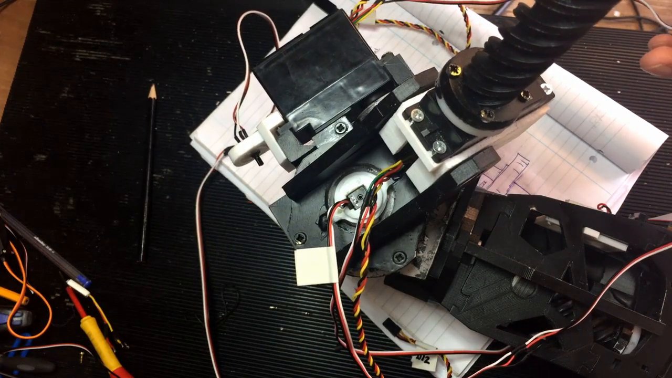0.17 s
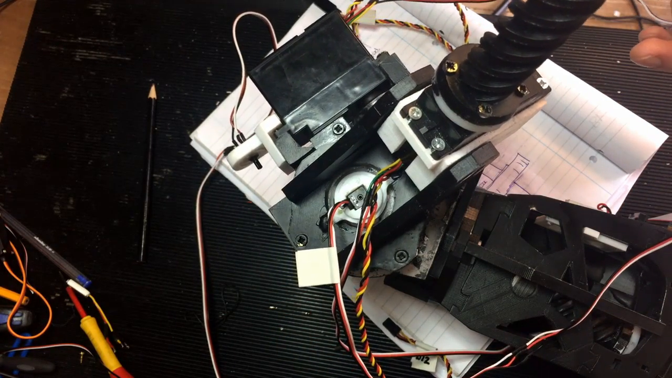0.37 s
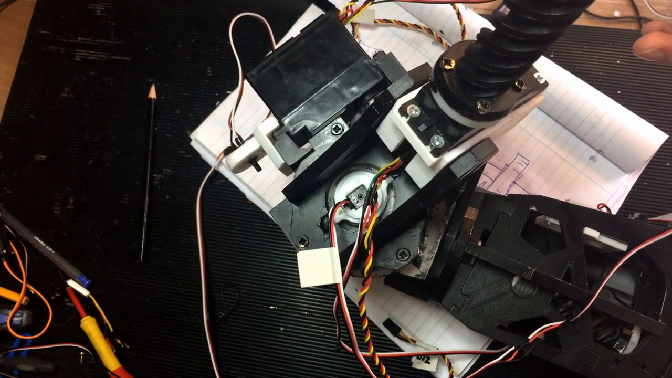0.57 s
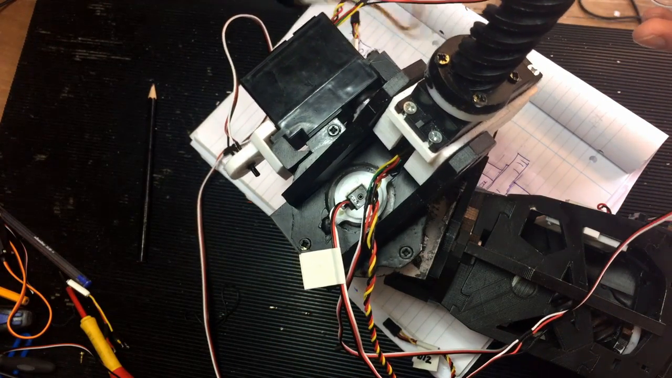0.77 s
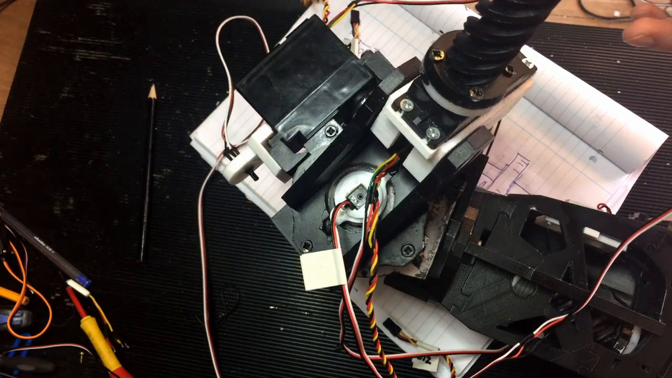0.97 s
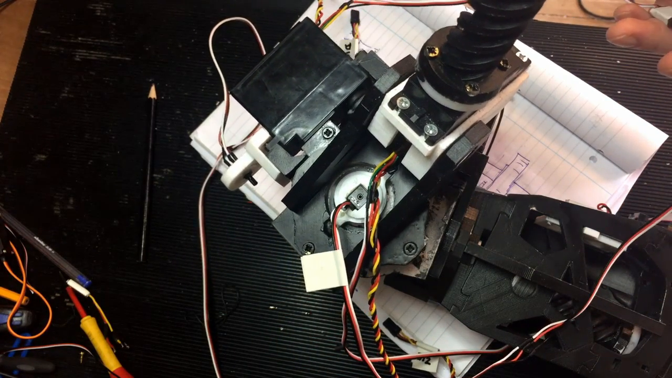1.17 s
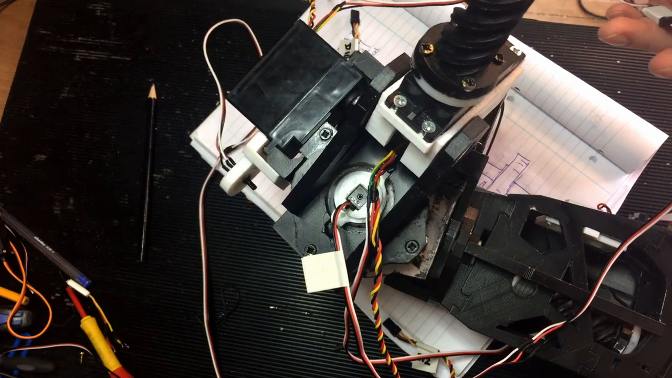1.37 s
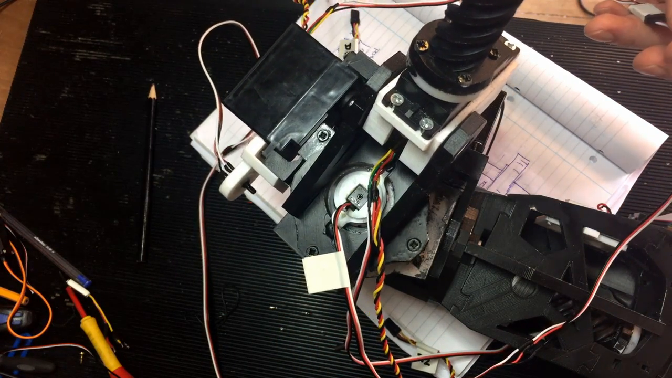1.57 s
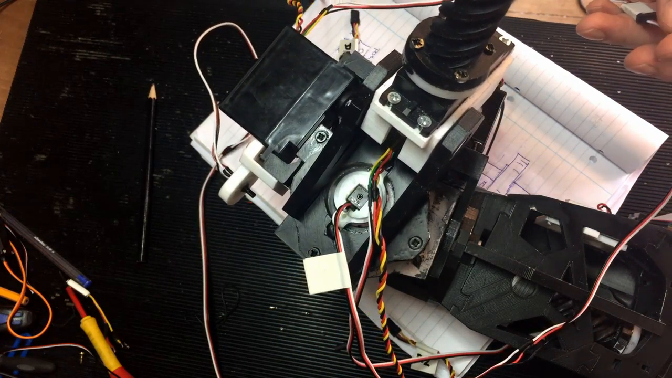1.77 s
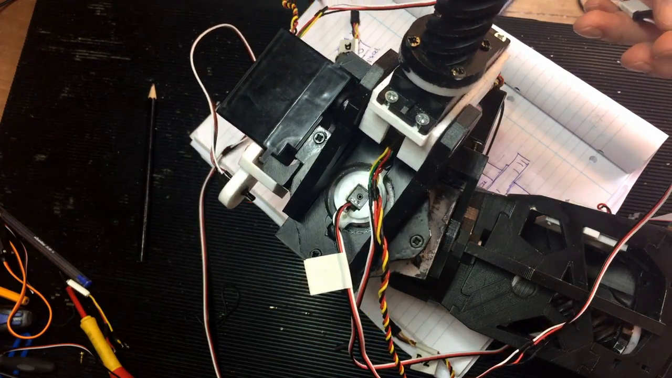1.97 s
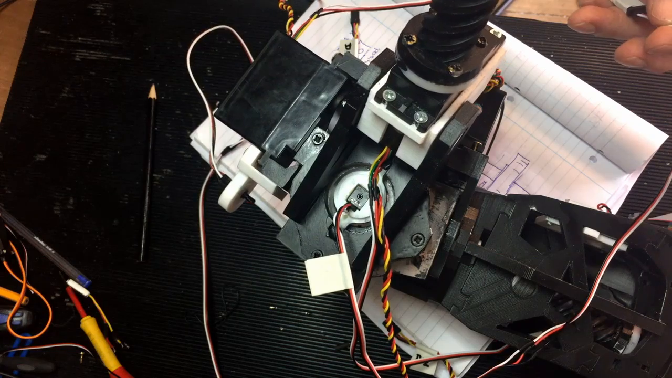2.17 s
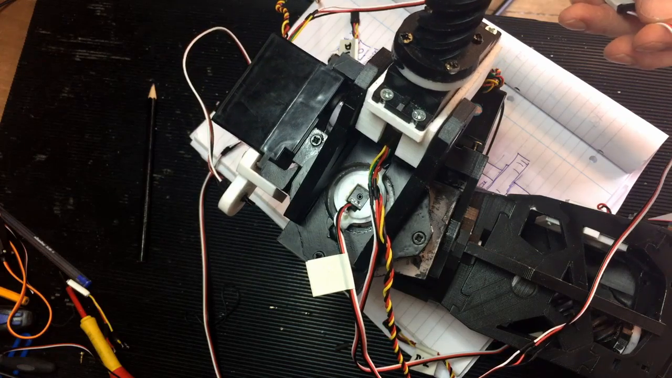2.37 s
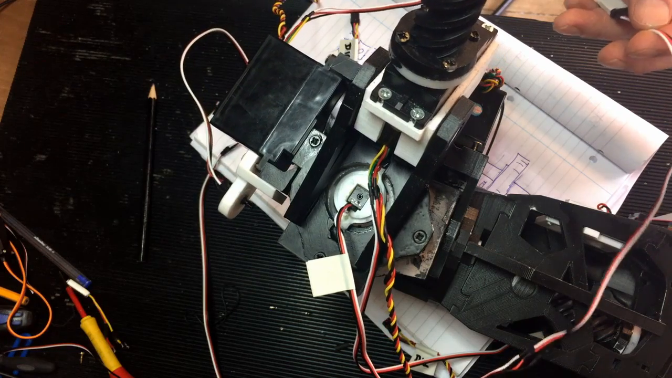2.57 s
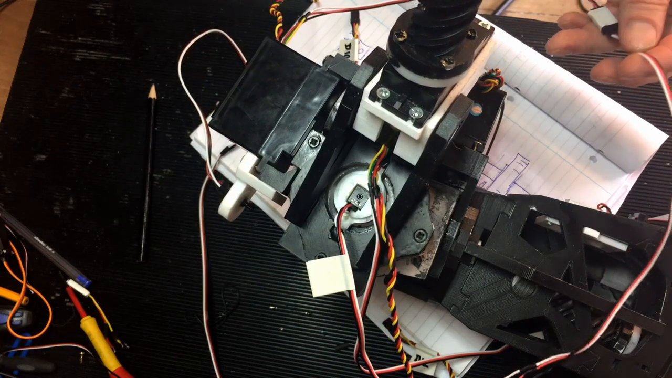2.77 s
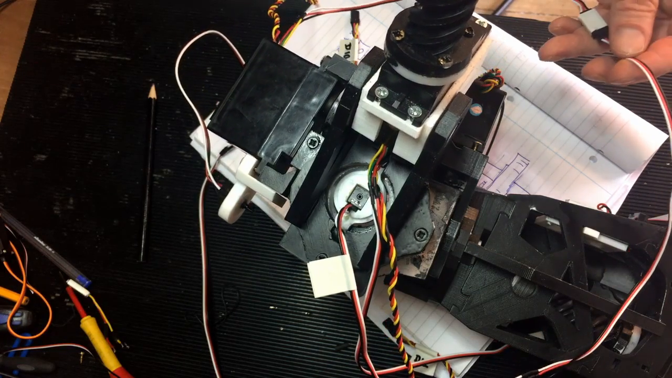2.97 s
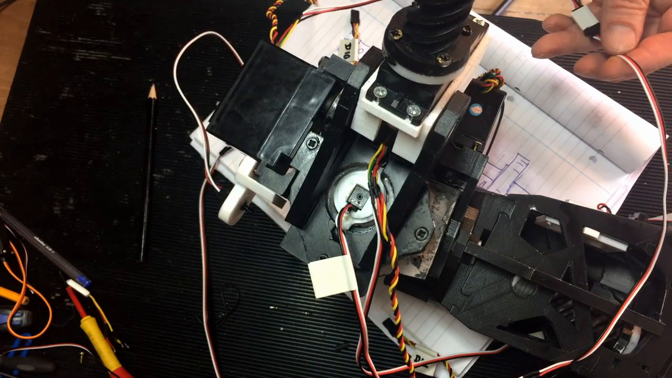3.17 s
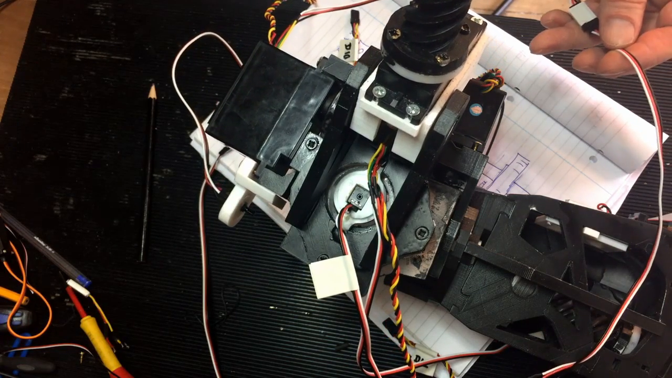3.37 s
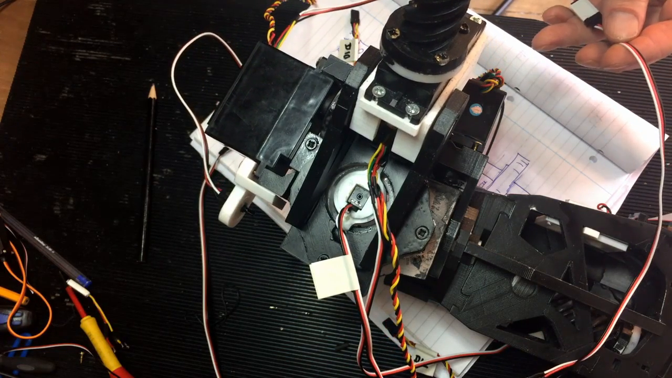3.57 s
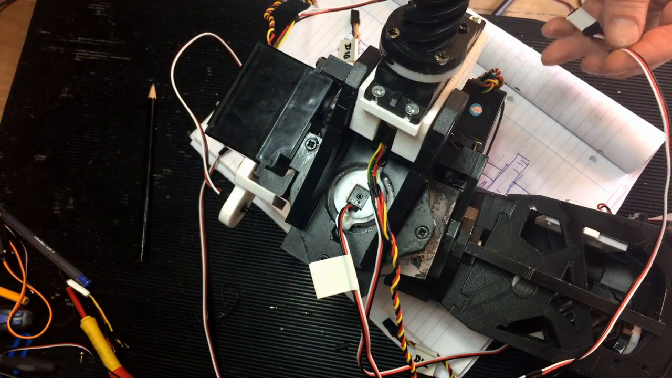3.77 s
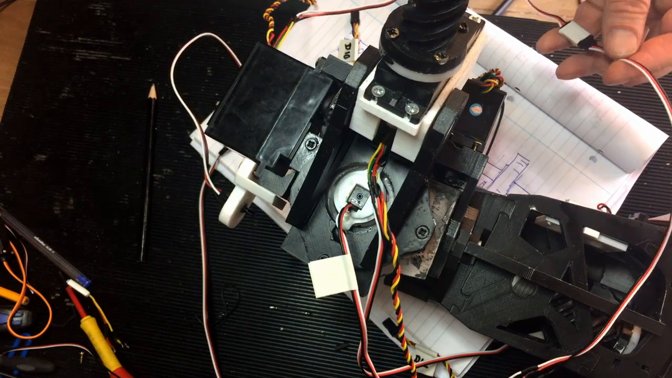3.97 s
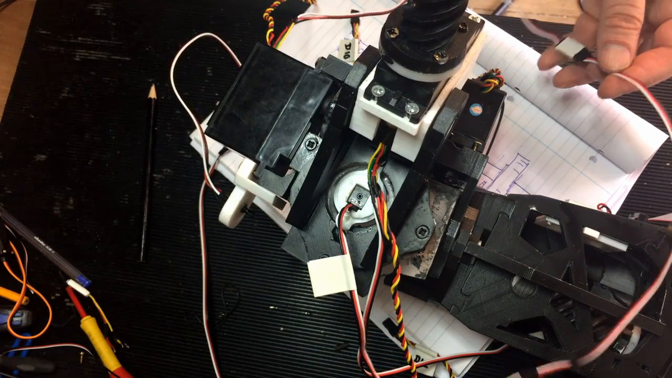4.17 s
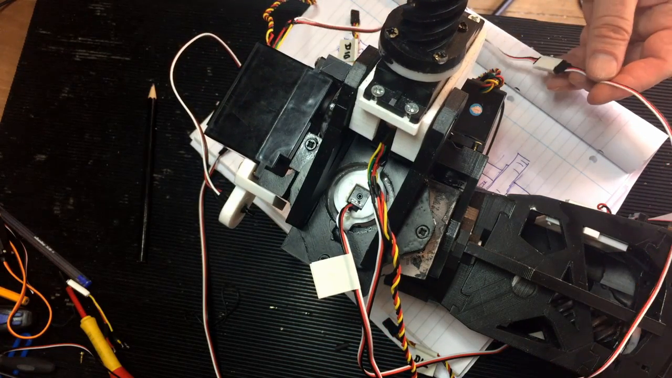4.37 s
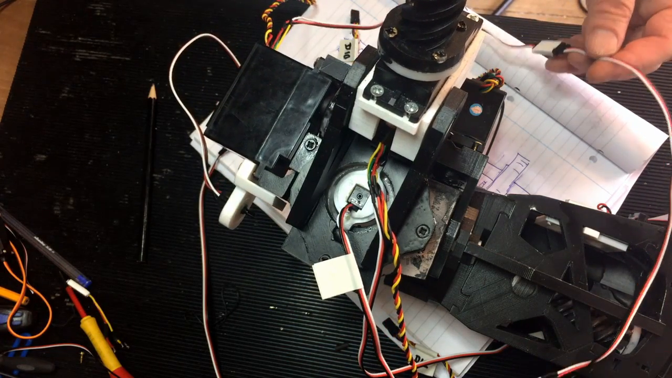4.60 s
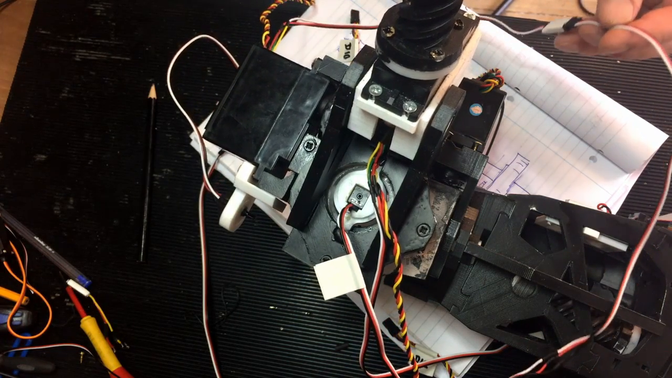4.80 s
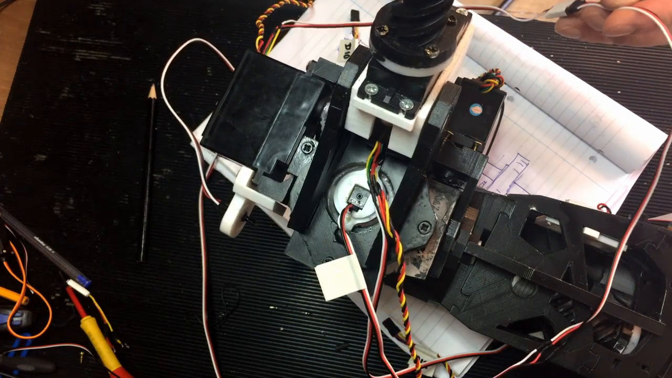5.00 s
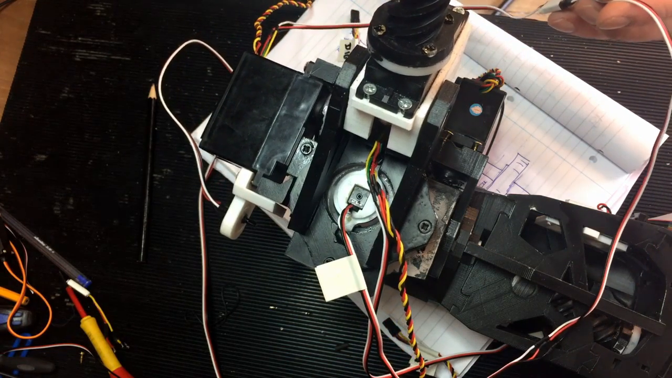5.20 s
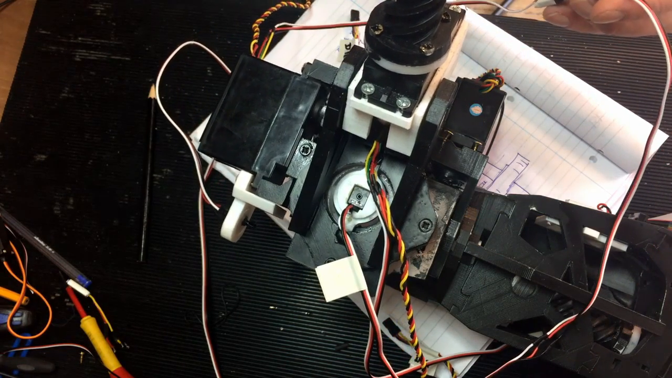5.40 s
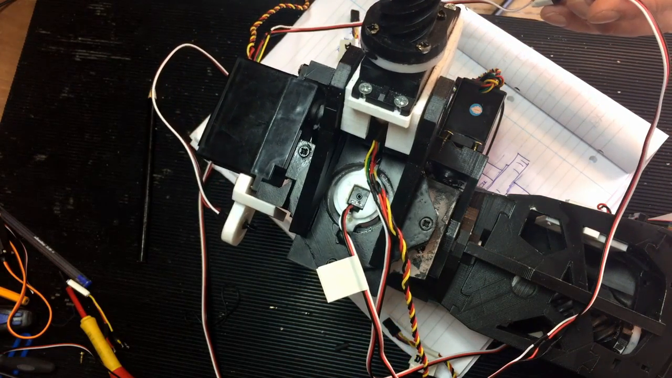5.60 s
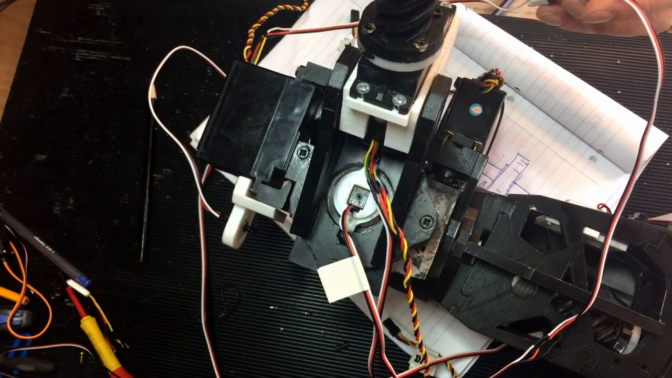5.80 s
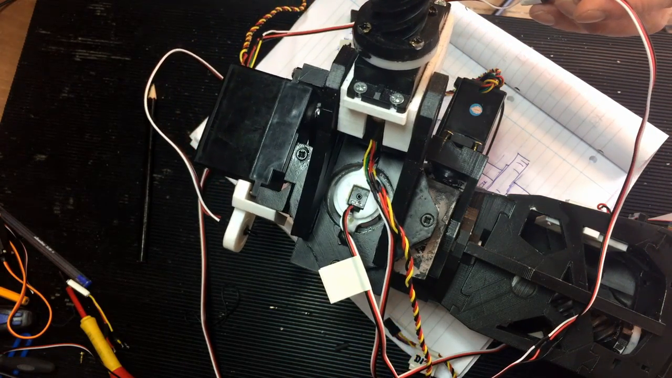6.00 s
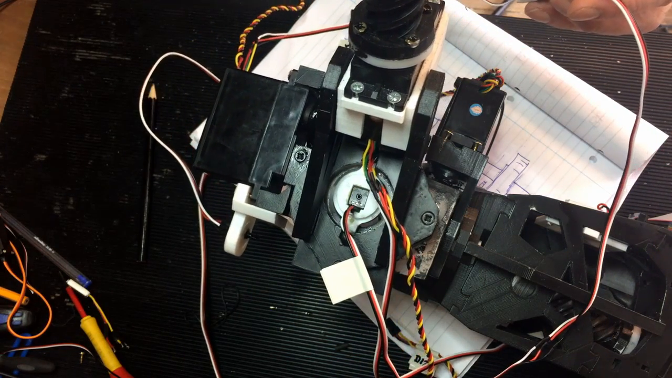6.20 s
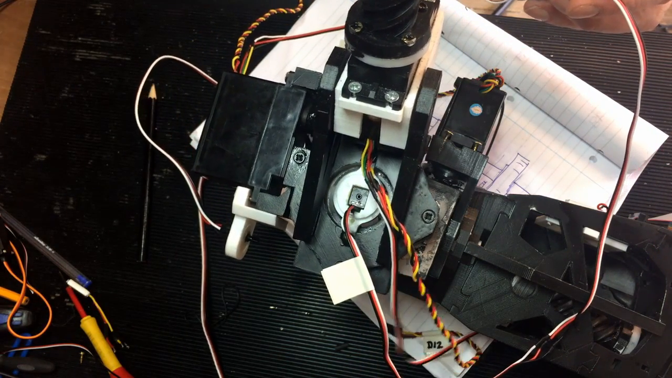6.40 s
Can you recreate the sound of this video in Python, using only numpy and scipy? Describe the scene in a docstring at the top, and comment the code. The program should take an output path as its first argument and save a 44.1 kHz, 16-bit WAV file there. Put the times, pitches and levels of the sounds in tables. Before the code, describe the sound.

A small geared servo whines and rasps with rapid ticking, slows and sinks almost away, clicks lightly, then whines thinly and fuller again.

```python
"""A small geared servo swings a robot arm on a workbench; its pinion whines and rasps through the housing,
while a holding servo ticks at every control pulse and the joints judder. The gears slow and sink almost away, a
hand-held lead clicks on the parts, and the whine picks up again, thin at first and then fuller. Throughout, two
frame modes drone and swell over a faint steady hum, room air and a thin servo hiss. Tones are drifting sines;
rasp, air and hiss are filtered noise; ticks are impulses ringing decaying modes."""
import sys
import numpy as np
from scipy import signal
from scipy.fft import rfft, irfft
from scipy.io import wavfile
from scipy.ndimage import uniform_filter1d

SR = 44100
rng = np.random.default_rng(int(sys.argv[2]) if len(sys.argv) > 2 else 0)


def store_pcm(level_fs):
    """Save levels as 16-bit WAV."""
    pcm = np.round(np.clip(level_fs, -1, 1) * 32767).astype(np.int16)
    wavfile.write(sys.argv[1], SR, np.atleast_2d(pcm).T)


N = 284356
TIME = np.arange(N) / SR   # s
BINS = np.maximum(np.arange(N // 2 + 1) * SR / N, 1)   # Hz

# motor speed through the two moves: (time [s], speed [turns/s])
MOTOR_SPEED = [(0, 535), (.2, 526), (.33, 487), (.6, 556), (.8, 655), (.96, 757), (1.1, 712), (1.2, 650),
               (1.48, 533), (1.73, 540), (1.88, 487), (2.33, 425), (2.7, 315), (3.4, 225), (4.4, 220),
               (4.65, 330), (5.2, 362), (5.5, 453), (5.78, 378), (6.14, 457), (6.45, 408)]
# tone bands of the pinion: (multiple of motor speed [1], first move [dB], second move [dB], smear [Hz])
PINION_ORDERS = [(4, -7, -23, 22), (5, -10.5, -7, 68), (6, -9.5, -2.5, 74), (8, -18, -8.5, 120),
                 (10, -6.5, -4, 110), (14, -20, -20, 910)]
# overall colour of the gearbox: (frequency [Hz], relative density [dB per Hz])
GEARBOX_COLOUR = [(300, -20.5), (600, -29.5), (850, -9.5), (1600, -13.5), (2300, -16), (2650, -7),
                  (3100, -1), (4700, 1.5), (6300, -1.5), (8600, -0.5), (10300, -7), (11500, -10.5),
                  (13500, -15.5), (16000, -20)]
# resonances (+) and dead spots (-) of the housing: (frequency [Hz], width [Hz], gain [dB])
HOUSING_MODES = [(2500, 44, -2.5), (3060, 77, 9.5), (3136, 120, -5), (3320, 61, 8.5), (3460, 62, -2),
                 (3560, 74, 3.5), (3850, 42, 7.5), (4047, 31, 12), (4060, 79, -16), (4176, 50, 9.5),
                 (4445, 68, 7), (4763, 177, -8), (4980, 130, 8.5), (5035, 57, -14.5), (5240, 57, 2),
                 (5540, 290, 7.5), (6120, 58, 2.5), (6200, 183, 7.5), (6440, 120, 10), (6590, 150, -7.5),
                 (7230, 270, -6.5), (7420, 190, 4.5), (7920, 81, 6), (8800, 490, 1), (9470, 150, -9.5),
                 (9900, 200, -0.5), (10390, 470, -9), (11500, 650, 4.5), (13100, 170, 0), (14500, 240, 7)]
# hardest kicks of the holding servo: (time [s], level before KICK_RAISE_DB is added [dB])
HARD_KICKS = [(0.277, -44), (1.627, -48), (1.687, -45.5), (2.109, -43.5), (2.552, -42.5), (2.692, -45),
              (3.177, -45), (3.257, -47.5), (3.438, -49.5), (3.539, -50.5), (3.56, -48.5), (3.6, -54),
              (3.68, -50.5), (3.781, -49), (3.821, -49), (3.841, -48), (3.982, -52), (4.184, -54),
              (4.406, -53), (4.568, -53.5), (5.11, -47), (5.372, -50), (5.976, -38.5)]
# modes that the ticks ring: (frequency [Hz], relative level [dB], t60 [s])
TICK_MODES = [(806, -16, 0.038), (1125, -14.5, 0.063), (1310, -15, 0.033), (1820, -7, 0.011),
              (2260, -15.5, 0.011), (2830, -51, 0.0079), (3277, -14.5, 0.049), (3510, -5, 0.016),
              (4300, -9, 0.0083), (5180, -2, 0.0026), (6300, -19, 0.0032), (8300, -16, 0.0083)]
# the lead and its plug knock on the parts: (time [s], level [dB], centre [Hz], width [octaves], t60 [s])
LEAD_CONTACTS = [(3.26, -43, 8700, 1, 0.017), (3.261, -66, 12200, 0.055, 0.098),
                 (4.025, -33.5, 2160, 0.78, 0.02), (4.0285, -42.5, 1320, 0.61, 0.037),
                 (4.268, -42, 9200, 0.19, 0.012), (4.268, -53, 4950, 2.5, 0.062)]
# the arm judders in its joints: (time [s], length [s], mean frequency [Hz], peak of fundamental [dB])
JOINT_JUDDERS = [(0.839, 0.066, 196, -46), (.925, 0.041, 183, -50.5), (0.965, 0.045, 197.5, -45.5),
                 (1.044, 0.035, 180, -47), (1.257, 0.042, 825, -57), (1.34, 0.053, 567, -56),
                 (2.031, 0.026, 185, -57)]
# low modes of the frame and bench: (mean frequency [Hz], resting level before wavering [dB])
FRAME_MODES = [(49, -74.5), (62, -74.5)]
# the frame sways and one mode swells: (time [s], length [s], mean frequency [Hz], level before wavering [dB])
FRAME_SWAYS = [(.68, 0.15, 49, -59), (.92, 0.19, 62, -56.5), (1.16, .6, 62, -65.5), (3.893, 0.58, 49, -64),
               (5.008, 0.29, 62, -61), (5.497, 1, 62, -56.5), (5.878, 0.83, 49, -62)]
# faint steady hum: (frequency [Hz], level [dB])
STEADY_HUM = [(100, -88.5), (200, -83), (296, -82.5)]
# colour of the workshop's still air: (frequency [Hz], relative density [dB per Hz])
AIR_COLOUR = [(40, -6.5), (70, 4), (180, -4), (330, -8.5), (500, -11.5), (1100, -11.5), (2600, -18.5),
              (5000, -34), (7200, -22), (8800, -22.5), (10500, -28), (12000, -25.5), (15900, -29.5)]

WHEEL_TEETH, PINION_TEETH = 47, 10
CRUISE_SPEED = 500   # turns per s
SECOND_MOVE_S = 4
TONE_DB = -3.5   # tones against the rasp, at cruise
# gear level at cruise, and its rise per doubling of speed
CRUISE_DB, DB_PER_OCTAVE = -43, 9
# between the moves the drive lets go and the gear sound sinks
RELEASE_S, RELEASE_FADE_S = 3.244, 0.23
ENGAGE_S, ENGAGE_FADE_S = 4.588, 0.38
PAUSE_LOSS_DB = 20
# in the second move the lower part of the gear sound builds up last
BUILD_UP_S, BUILD_UP_DB, BUILD_UP_EDGE_HZ = 1.56, 6.5, 2800
PULSE_RATE_HZ, FIRST_PULSE_S = 49.65, .0153
# tick level at cruise, and its rise per doubling of motor speed
TICK_DB, TICK_DB_PER_OCTAVE = -46.5, 7.5
KICK_RAISE_DB = 4
# as the first move dies away the servo hunts and its ticks grow
HUNT_FROM_S, HUNT_TO_S, HUNT_DB = 3.36, 3.9, 3.5
SWAY_FADE_S = .1
ROOM_DB = -66
CUTOFF_HZ = 15900


def gears(tone_rise_db=6, tone_top_hz=7100, runout=0.59, rasp_db=1.85, grain_db=2.5,
          bright_db=9, treble_hz=8400, second_bright_db=2.5):
    """Tooth meshing and sliding friction excite the housing; speed makes the sound purer and brighter."""
    speed, octaves = motor()
    second = TIME > SECOND_MOVE_S   # after the pause the teeth bear on each other differently
    wheel_speed = speed * PINION_TEETH / WHEEL_TEETH
    wheel_turns = np.cumsum(wheel_speed * (1 + .004 * drift(30.8))) / SR
    # an off-centre wheel swings the pitch once a turn, which splits each tone into a cluster
    swing = runout * wheel_speed * np.sin(2 * np.pi * wheel_turns) / PINION_TEETH
    tones = np.zeros(N)
    for multiple, first_db, second_db, smear in PINION_ORDERS:
        order_gain = from_db(np.where(second, second_db, first_db))
        # backlash smears every tone into a narrow band
        tones += order_gain * smeared(multiple * (speed + swing), smear)
    # the plastic teeth soften the highest tones
    tones = low_pass(tones, tone_top_hz) * from_db(TONE_DB + tone_rise_db * octaves)
    sliding = rms_one(rng.standard_normal(N) * from_db(grain_db * drift(700)))
    rasp = rms_one(sliding + worn_wheel(wheel_turns))
    excitation = (rasp + tones) * from_db(rasp_db * drift(62))
    sound = build_up(colour(housing(excitation), GEARBOX_COLOUR))
    # evened out, so that a tone crossing a resonance does not jump in level
    sound = sound / np.sqrt(uniform_filter1d(sound ** 2, size=1500))
    # faster teeth meet harder, which lifts the treble
    body = low_pass(sound, treble_hz)
    treble = (sound - body) * from_db(bright_db * octaves + second_bright_db * second)
    return from_db(gear_level(octaves)) * (body + treble)


def motor():
    """Pitch follows rotation: speed in turns per second, and in octaves relative to cruise."""
    times, speeds = np.transpose(MOTOR_SPEED)
    speed = np.interp(TIME, times, speeds)
    return speed, np.log2(speed / CRUISE_SPEED)


def smeared(hz, width):
    """Two slowly random quadratures blur a moving tone, which comes and goes as the teeth seat and unseat."""
    phase = 2 * np.pi * np.cumsum(hz) / SR
    seating = from_db(2.5 * drift(9) - .7)
    return seating * (drift(width) * np.sin(phase) + drift(width) * np.cos(phase))


def worn_wheel(turns, size=200):
    """Surface flaws recur on every turn: periodicity makes a comb of fine lines that glide with speed."""
    flaws = signal.resample(rng.standard_normal(size), 10 * size)
    return rms_one(np.interp(turns, np.arange(len(flaws)) / len(flaws), flaws, period=1))


def housing(x):
    """Modal response: each resonance lifts its band, each dead spot cuts it."""
    response = 1
    for hz, width, db in HOUSING_MODES:
        detune, gain = 2j * (BINS - hz) / width, from_db(db / 2)
        response = response * (detune + gain) / (detune + 1 / gain)
    return irfft(rfft(x) * response, N)


def build_up(sound):
    """Loading extends the spectrum: the second move starts thin and fills out as the gears take the load."""
    thin = (TIME > SECOND_MOVE_S) * (1 - ramp(ENGAGE_S, BUILD_UP_S) ** 2)
    low_part = low_pass(sound, BUILD_UP_EDGE_HZ)
    return sound + low_part * (from_db(-BUILD_UP_DB * thin) - 1)


def gear_level(octaves, slack_db=3.5, uneven_db=.5):
    """Level in dB follows speed, falls off faster when the teeth run slack, and sinks in the pause."""
    paused = ramp(RELEASE_S, RELEASE_FADE_S) * (1 - ramp(ENGAGE_S, ENGAGE_FADE_S)) ** 2
    slack = np.minimum(octaves, 0) ** 2   # grows below cruise speed
    level = CRUISE_DB + DB_PER_OCTAVE * octaves - slack_db * slack * (1 - paused)
    return level - PAUSE_LOSS_DB * paused + uneven_db * drift(9.2)


def ticks(spread_db=2.5, late_s=.0003, mode_spread_db=3.0, upper_share=0.81, rattle=0.13, rattle_s=0.0018):
    """Impulsive excitation: each control pulse jerks the holding servo's gears across their backlash."""
    pulse_s = np.arange(FIRST_PULSE_S, TIME[-1] - .01, 1 / PULSE_RATE_HZ)
    chance = rng.standard_normal((len(pulse_s), 2))
    usual_db = tick_level(pulse_s)
    db = usual_db + spread_db * np.minimum(chance[:, 0], 1)
    for when, peak_db in HARD_KICKS:
        db[np.argmin(abs(pulse_s - when))] = peak_db + KICK_RAISE_DB
    at = ((pulse_s + late_s * abs(chance[:, 1])) * SR).astype(int)
    out, softest_db = np.zeros(N), usual_db.min()
    for k, (hz, mode_db, t60) in enumerate(TICK_MODES):
        # a harder kick lifts the modes above 3 kHz slightly less than the low ones
        share = 1 if hz < 3000 else upper_share
        strike_db = softest_db + share * (db - softest_db) + mode_db
        clicks = np.zeros(N)
        clicks[at] = from_db(strike_db + mode_spread_db * rng.standard_normal(len(at)))
        # the teeth rattle briefly after they meet
        settling = signal.lfilter([1], [1, -np.exp(-1 / (rattle_s * SR))], clicks + 1e-18)
        rattling = rattle * settling * rng.standard_normal(N)
        out += ring((-1) ** k * clicks * 0.79 + rattling, hz, t60)   # neighbouring modes in opposite sign
    return out


def tick_level(s):
    """Impact strength grows with speed: usual level in dB of the ticks at times s."""
    _, octaves = motor()
    hunting = (s > HUNT_FROM_S) & (s < HUNT_TO_S)
    return TICK_DB + TICK_DB_PER_OCTAVE * np.interp(s, TIME, octaves) + hunting * HUNT_DB


def lead_clicks():
    """Damped contact: each light knock is a noise burst that dies quickly within its own band."""
    out = np.zeros(N)
    for s, db, hz, octaves, t60 in LEAD_CONTACTS:
        edges = np.minimum(hz * 2 ** (np.array([-.5, .5]) * octaves), .45 * SR)
        band_filter = signal.butter(2, edges, "band", fs=SR, output="sos")
        band = rms_one(signal.sosfilt(band_filter, rng.standard_normal(N)))
        attack = np.clip((TIME - s) * hz / 6, 0, 1)   # six cycles of the centre frequency
        decay = np.exp(-np.log(1000) * abs(TIME - s) / t60)
        out += from_db(db) * band * attack * decay
    return out


def judders(waver=0.066, overtone_db=-17):
    """Stick-slip oscillation: a joint sticks and slips for some cycles, swelling and fading."""
    out, clock = np.zeros(N), np.cumsum(1 + waver * drift(68.0)) / SR
    for s, length, hz, db in JOINT_JUDDERS:
        swell = np.sin(np.pi * np.clip((TIME - s) / length, 0, 1))
        phase = 2 * np.pi * hz * clock
        overtones = sum(np.sin(k * phase) for k in (2, 3, 4))
        out += from_db(db) * swell * (np.sin(phase) + from_db(overtone_db) * overtones)
    return out


def hum(wander_hz=2.57, rest_waver_db=4, sway_waver_db=-1.5):
    """Structural modes: frame and bench drone, swelling when the frame sways, over a faint steady hum."""
    def drone(hz, db, waver_db):
        """A wandering sine models a mode of unsteady pitch and level."""
        phase = 2 * np.pi * np.cumsum(hz + wander_hz * drift(7.94)) / SR
        return from_db(db + waver_db * drift(5)) * np.sin(phase)
    resting = sum(drone(hz, db, rest_waver_db) for hz, db in FRAME_MODES)
    swaying = np.zeros(N)
    for s, length, hz, db in FRAME_SWAYS:
        swell = ramp(s, SWAY_FADE_S) - ramp(s + length - SWAY_FADE_S, SWAY_FADE_S)
        swaying += drone(hz, db, sway_waver_db) * swell
    steady = sum(from_db(db) * np.sin(2 * np.pi * hz * TIME) for hz, db in STEADY_HUM)
    return np.sqrt(2) * (resting + swaying + steady)   # levels are rms


def background(sing_hz=8200, sing_width=1000, sing_db=-78, flicker_db=2):
    """Filtered noise: room air, and the thin, high, flickering hiss of the powered servos."""
    air = from_db(ROOM_DB) * rms_one(colour(rng.standard_normal(N), AIR_COLOUR))
    sing = resonance(rng.standard_normal(N), sing_hz, sing_width)
    sing = resonance(sing, sing_hz, sing_width)
    return air + from_db(sing_db + flicker_db * drift(40)) * rms_one(sing)


def workshop(x, t60=0.071, wet_db=-11):
    """Diffuse reverberation: dense, short reflections from the bench and the arm's own plates."""
    t = TIME[:SR // 2]
    tail = rng.standard_normal(len(t)) * np.exp(-np.log(1000) * t / t60) * (t > .002)
    return x + from_db(wet_db) * signal.fftconvolve(x, tail / np.linalg.norm(tail))[:N]


def from_db(db):
    """Logarithmic level: decibels to amplitude gain."""
    return 10 ** (np.asarray(db) / 20)


def rms_one(x):
    """Effective value: scale to unit rms."""
    return x / np.sqrt(np.mean(x ** 2) + 1e-20)


def ramp(start, length):
    """Linear fade: rises from 0 to 1 over `length` seconds."""
    return np.clip((TIME - start) / length, 0, 1)


def drift(rate, size=16):
    """Low-passed noise: slow chance with unit rms that changes about `rate` times a second."""
    pole, run_in = np.exp(-2 * np.pi * rate * size / SR), 1000
    noise = rng.standard_normal(N // size + run_in + 2)
    slow = signal.lfilter([1], [1, -2 * pole, pole * pole], noise)[run_in:]
    return rms_one(np.interp(np.arange(N) / size, np.arange(len(slow)), slow))


def colour(x, spectrum):
    """Spectral weighting by (frequency [Hz], gain [dB]) points, falling away below the first."""
    hz, db = np.transpose(spectrum)
    gain = from_db(np.interp(np.log(BINS), np.log(hz), db)) * np.minimum(BINS / hz[0], 1) ** 2
    return irfft(rfft(x) * gain, N)


def low_pass(x, hz):
    """Zero-phase filtering: a smooth roll-off above hz."""
    return irfft(rfft(x) / (1 + (BINS / hz) ** 12), N)


def resonance(x, hz, width):
    """Damped resonator: a band-pass with gain 1 at its centre."""
    r = np.exp(-np.pi * width / SR)
    zeros = np.array([1, 0, -1]) * (1 - r * r) / 2
    return signal.lfilter(zeros, [1, -2 * r * np.cos(2 * np.pi * hz / SR), r * r], x)


def ring(clicks, hz, t60):
    """Free decay: a unit click sets a sine of initial height 1 ringing."""
    r, w = np.exp(-np.log(1000) / (t60 * SR)), 2 * np.pi * hz / SR
    return signal.lfilter([0, np.sin(w)], [1, -2 * r * np.cos(w), r * r], clicks + 1e-18)


def scene():
    """Superposition: the arm's sounds with their reflections, over the hum and quiet room."""
    arm = workshop(gears() + ticks() + lead_clicks())
    return (arm + judders() + hum() + background())[None]


def record(dry):
    """Band limiting: an elliptic low-pass cuts the top steeply."""
    return signal.sosfilt(signal.ellip(10, .1, 70, CUTOFF_HZ, fs=SR, output="sos"), dry)


dry = scene()
out = record(dry)
store_pcm(out)
```